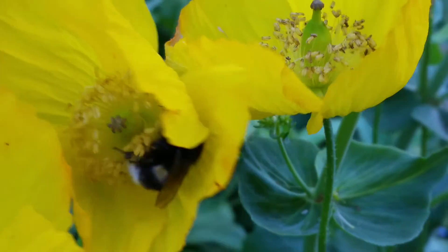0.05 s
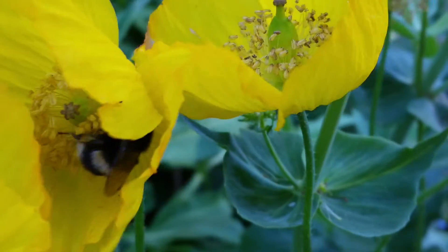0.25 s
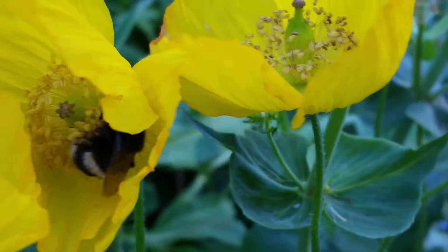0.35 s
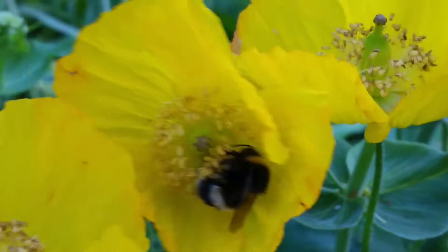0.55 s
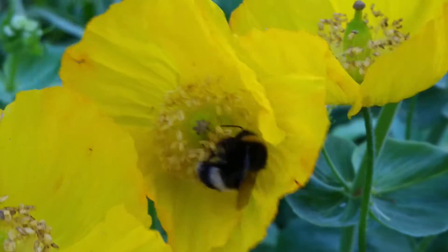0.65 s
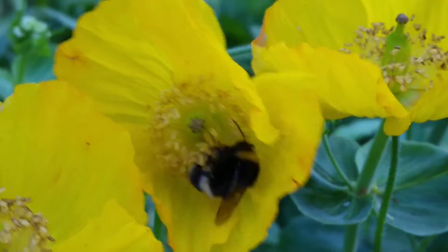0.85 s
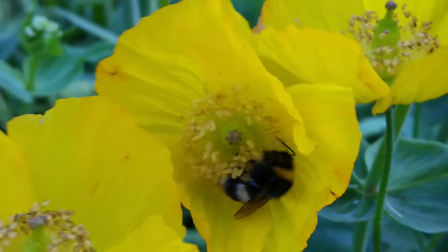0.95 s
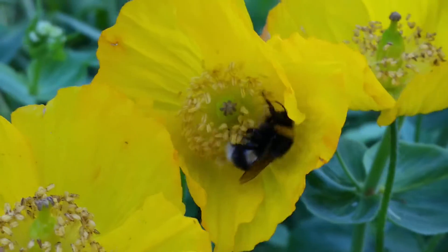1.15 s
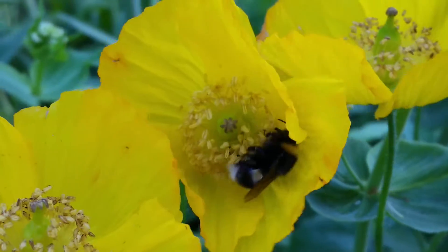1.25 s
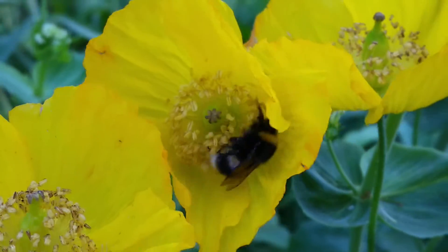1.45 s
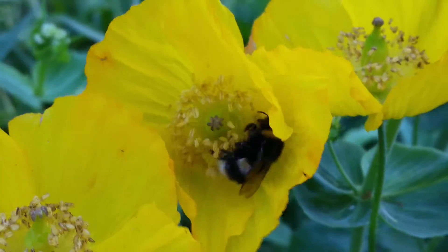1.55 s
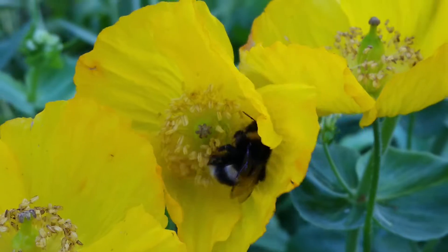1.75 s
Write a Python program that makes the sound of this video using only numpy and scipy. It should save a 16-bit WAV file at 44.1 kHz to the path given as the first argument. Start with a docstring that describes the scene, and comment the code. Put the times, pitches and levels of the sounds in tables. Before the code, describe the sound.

Low wind and handling rumble sits right on a camera microphone in a quiet garden. The grip bumps softly, the plastic casing clicks three times quickly, and a faint lens motor whirrs and hisses, then stops.

```python
"""Light wind and a hand's grip rumble right on the two microphone ports of a camera in a quiet garden.
The grip bumps softly, mostly on the right, and the plastic casing gives a quick triple click on the left.
Inside the camera the lens motor runs up with gear noise and a faint whine, slides the hissing barrel,
then stops. A thin idle whirr and the outdoor air lie under it all; a faint hum comes and goes."""
import sys
import numpy as np
from scipy import signal
from scipy.fft import rfft, irfft, next_fast_len
from scipy.io import wavfile
from scipy.ndimage import uniform_filter1d, map_coordinates

SR = 44100
rng = np.random.default_rng(int(sys.argv[2]) if len(sys.argv) > 2 else 0)


def master(y):
    """Save y as 16-bit WAV."""
    cut = np.clip(np.atleast_2d(y).T, -1, 1)
    pcm = np.round(cut * 32767)  # scale
    wavfile.write(sys.argv[1], SR, pcm.astype(np.int16))


N = 79380  # 1.8 s


def amp(db):
    """Decibels to gain."""
    return 10 ** (np.asarray(db) / 20)


def unit(x):
    """Scale to rms 1."""
    return x / np.sqrt(np.mean(x ** 2) + 1e-20)


def along(points, hz):
    """Rows of (freq_hz, value) read on a log frequency axis."""
    freqs, values = np.transpose(points)
    return np.interp(np.log(hz + 1), np.log(freqs + 1), values)


def curve(rows, column=1):
    """One column of a time table, a value per sample."""
    rows = np.asarray(rows)
    return np.interp(np.arange(N) / SR, rows[:, 0], rows[:, column])


def wobble(rate_hz):
    """A smooth random curve, rate_hz knots a second."""
    knots = rng.standard_normal(int(N * rate_hz / SR) + 4)
    return map_coordinates(knots, [np.arange(N) * rate_hz / SR])


def filtered(x, response):
    """Filter x by a gain that depends on frequency."""
    size = next_fast_len(N + 8192)
    return irfft(rfft(x, size) * response(np.fft.rfftfreq(size, 1 / SR)), size)[..., :N]


def noise(colour):
    """Coloured noise of rms 1."""
    return unit(filtered(rng.standard_normal(N), lambda hz: amp(along(colour, hz))))


def noise_pair(colour):
    """Unrelated noise for the two ports."""
    return np.array([noise(colour), noise(colour)])


def panned(x, right_db):
    """One sound at both ports, with a gain on the right."""
    return np.array([x, amp(right_db) * x])


# Wind and grip, directly on the left and the right port: time_s, level_db
RUMBLE_LEFT_LEVEL = [(0, -40), (.09, -38), (.16, -51.5), (.22, -54.5), (.26, -40), (.33, -63), (.42, -36.5),
                     (.54, -48.5), (.6, -35.5), (.67, -37), (.71, -33.5), (.85, -47), (1.03, -40),
                     (1.13, -50.5), (1.36, -48.5), (1.45, -46), (1.55, -48.5), (1.63, -44), (1.8, -53)]
RUMBLE_RIGHT_LEVEL = [(0, -37.5), (.07, -48), (.12, -58), (.19, -47.5), (.23, -33), (.38, -26), (.44, -38),
                      (.51, -32.5), (.62, -34), (.74, -37.5), (.82, -33.5), (1.03, -44), (1.12, -53),
                      (1.18, -40.5), (1.3, -50), (1.41, -41), (1.49, -49.5), (1.6, -36.5), (1.66, -63),
                      (1.73, -43.5), (1.8, -66)]
# Their spectrum at either port: freq_hz, level_db
RUMBLE_COLOUR = [(15, -26), (26, -11), (40, 4), (60, -1.5), (100, -2.5), (150, -15.5), (220, -22.5),
                 (350, -36.5), (700, -51.5), (2000, -100)]

def rumble():
    """Wind and grip stir each port on its own, in small lumps of even strength."""
    low = noise_pair(RUMBLE_COLOUR)
    local_power = np.abs(uniform_filter1d(low ** 2, size=2600, axis=1))
    lumps = low / np.sqrt(local_power + 0.12)
    return lumps * amp([curve(RUMBLE_LEFT_LEVEL), curve(RUMBLE_RIGHT_LEVEL)])


# Garden air, all around the microphone: freq_hz, level_db
AIR_COLOUR = [(100, -5.5), (350, 2.5), (550, -8), (1000, -12), (2000, -18), (3000, -23), (4000, -13),
              (5000, -20.5), (5600, -29), (7000, -39), (8500, -43.5), (10000, -32.5), (15600, -25.5)]

def garden_air():
    """Outdoor air reaches both ports as a faint, wide, gently wavering hush."""
    return amp(-64 + 1.4 * wobble(8.5)) * noise_pair(AIR_COLOUR)


# The idling camera, close to the left port: freq_hz, level_db
WHIRR_COLOUR = [(250, -3), (420, -12.5), (520, 6.5), (700, -5.5), (1100, -8.5), (1600, -19), (2200, -12),
                (2900, -37.5), (3450, -12.5), (3900, 0), (4400, -5.5), (5000, -12.5), (5600, -31),
                (7000, -73)]

def idle_whirr():
    """The camera idles with a thin, slightly fluttering whirr."""
    return panned(amp(-60 + wobble(40.8)) * noise(WHIRR_COLOUR), right_db=-31)


# The hand on the grip, mostly at the right port: centre_s, level_db, pitch_hz, left_gain_db
GRIP_BUMPS = [(.287, -23.5, 106, -24), (.313, -12.5, 129, -46), (0.321, -17, 111, -36),
              (0.3329, -12.5, 95, -41), (.365, -12.5, 100.5, -41), (.391, -24.5, 102, -22),
              (0.505, -22, 108, -41), (.541, -10, 84, -42), (.551, -14, 99, -41), (.78, -28.5, 90, -6),
              (1.036, -26, 88, -31), (1.164, -33.5, 87, -31), (1.44, -35, 81.7, 1.5),
              (1.585, -30.5, 84, -23)]

def grip_bumps():
    """Each bump is one soft push and rebound, steepest in its middle."""
    push_width_cycles, edge_width_cycles, edge_share = 0.34, 0.17, 0.051  # widths are half widths
    out = np.zeros((2, N))
    for centre_s, level_db, pitch_hz, left_gain_db in GRIP_BUMPS:
        cycles = (np.arange(N) / SR - centre_s) * pitch_hz
        push = np.sin(2 * np.pi * cycles) / np.cosh(np.clip(cycles / push_width_cycles, -20, 20)) ** 2
        edge_time = np.clip(cycles / edge_width_cycles, -20, 20)
        edge = np.sin(np.pi * edge_time) / np.cosh(edge_time) ** 2
        out -= amp([[level_db + left_gain_db], [level_db]]) * (push + edge_share * edge)
    return out


# Turning rate of the lens motor, inside the camera: time_s, rate_hz
SHAFT_SPEED = [(.33, 335.5), (.47, 296), (.56, 268.5), (.6, 271.5), (.67, 324.5), (.74, 297), (.81, 278.5),
               (.87, 287), (.93, 279), (1.0, 289), (1.05, 309.5)]

def shaft_phase():
    """The motor's shaft turns a little unsteadily; its angle in radians."""
    rate_hz = curve(SHAFT_SPEED) * (1 + 0.0095 * wobble(70))
    return 2 * np.pi * np.cumsum(rate_hz) / SR


# Effort of the motor, close to both ports: time_s, level_db
MOTOR_EFFORT = [(0, -65), (.26, -67), (.36, -62), (.46, -59), (.56, -57.5), (.66, -59), (.73, -56.5),
                (.85, -56.5), (1.01, -55.5), (1.08, -61), (1.2, -64), (1.32, -71.5), (1.8, -97)]
# Its gear noise and its fine fizz: freq_hz, level_db
GEAR_COLOUR = [(150, -37), (450, -0.5), (1200, -4), (1900, -4.5), (2800, -9.5), (3300, -11.5), (4000, 4),
               (4600, -2), (5200, -9.5), (5800, -18), (8000, -54)]
FIZZ_COLOUR = [(4500, -44), (6000, -17), (7600, -21), (8300, -11), (9400, 0), (10200, -5.5), (11300, -2),
               (13500, -6.5), (15600, -5)]
# How alike the gears sound at the two ports: freq_hz, correlation
GEAR_LIKENESS = [(400, 0.65), (1000, -0.2), (2400, -0.18), (6000, -0.14)]
# Its whine, relative to the gears at full effort: shaft_harmonic, level_db
WHINE_PARTIALS = [(4, -11.5), (5, -14.5), (9, -21), (11, -27)]

def lens_motor(phase):
    """Gear noise follows the motor's effort; whine and fizz swell faster than the gears."""
    full_db, fizz_full_db = -55, -52  # levels at full effort
    whine_growth, fizz_growth = 2.8, 2.01  # dB per dB of effort
    effort_db = curve(MOTOR_EFFORT) + 0.5 * wobble(59.74)
    load_db = effort_db - full_db

    def mid_side_gains(hz):
        angle = np.arccos(np.clip(along(GEAR_LIKENESS, hz), -1, 1)) / 2
        return np.array([np.cos(angle), np.sin(angle)])

    mid, side = filtered(noise_pair(GEAR_COLOUR), mid_side_gains)
    gears = amp(effort_db) * unit(np.array([mid + side, mid - side]))
    whine = np.zeros((2, N))
    for harmonic, level_db in WHINE_PARTIALS:
        peak = np.sqrt(2) * amp(level_db + 2.6 * wobble(25))
        whine += peak * np.sin(harmonic * phase + rng.uniform(0, 2 * np.pi, (2, 1)))
    whine *= amp(full_db + whine_growth * load_db)
    fizz = amp(fizz_full_db + fizz_growth * load_db) * noise_pair(FIZZ_COLOUR)
    lean_left = amp([[1], [-1]])
    return (gears + whine) * lean_left + fizz


# The sliding lens barrel, close to the left port: time_s, level_db
BARREL_LEVEL = [(0, -75), (.1, -67), (.17, -85), (.3, -72.5), (.37, -55), (.415, -52), (.441, -73),
                (.447, -46.5), (.575, -45.5), (.586, -56), (.68, -58.5), (.76, -50.5), (.84, -46),
                (1.005, -48.5), (1.05, -68.5), (1.17, -75.5), (1.3, -93), (1.8, -91)]
# Hiss of its first, brighter stroke and of its second: freq_hz, level_db
FIRST_STROKE = [(7000, -61), (8200, -32), (9000, -2), (9600, 3.5), (10400, 10.5), (11300, -6), (12300, 3),
                (13200, -23), (15600, -2)]
SECOND_STROKE = [(7000, -57), (8200, -20.5), (9300, -12), (9900, 3), (10600, -3.5), (11300, -7),
                 (12100, -11.5), (13200, -17), (15600, -16)]
# Passage from one stroke to the next: time_s, second_stroke_share
STROKE_BLEND = [(.58, 0.042), (.68, 1)]

def lens_barrel(phase):
    """The barrel slides in two strokes, its hiss pulsing once and twice with each turn of the motor."""
    scrape_db = 4 * np.sin(phase) + 2.8 * np.sin(2 * phase) + 0.7 * wobble(120)
    share = curve(STROKE_BLEND)
    hiss = np.sqrt(1 - share) * noise(FIRST_STROKE) + np.sqrt(share) * noise(SECOND_STROKE)
    return panned(amp(curve(BARREL_LEVEL)) * unit(amp(scrape_db) * hiss), right_db=-24)


# Clicks of the casing, close by on the left: start_s, level_db, dulling_db_per_octave
CASING_CLICKS = [(0.6085, -15, 0), (0.6168, -22, 2), (0.6331, -21, 1.5)]
# Ring of the casing: pitch_hz, level_db, t60_s
CASING_MODES = [(280, -3, 0.017), (503, 0, 0.017), (970, -8, 0.0059), (1186, -1, 0.0083),
                (1960, -6.5, 0.0037), (2236, -15, 0.015), (4080, -11, 0.0079), (4360, -18.5, 0.013)]

def casing_clicks():
    """The plastic casing snaps and rebounds twice, each time with a tiny crack and a short ring."""
    crack_db, crack_t60_s, ring_top_hz = -26.5, 0.0084, 4570
    pivot_hz = CASING_MODES[1][0]  # dulling tilts the ring about this mode
    lowpass = signal.butter(6, ring_top_hz, fs=SR, output="sos")
    t = np.arange(SR // 10) / SR
    out = np.zeros((2, N))
    for start_s, level_db, dulling in CASING_CLICKS:
        ring = np.zeros(len(t))
        for k, (pitch_hz, mode_db, t60_s) in enumerate(CASING_MODES):
            polarity = (-1) ** (k // 2)
            envelope = amp(mode_db - dulling * np.log2(pitch_hz / pivot_hz) - 60 * t / t60_s)
            ring += polarity * envelope * np.sin(2 * np.pi * pitch_hz * t)
        crack = amp(crack_db - 9.3 * dulling - 60 * t / crack_t60_s) * noise(FIZZ_COLOUR)[:len(t)]
        click = panned(signal.sosfilt(lowpass, ring), right_db=-20.5) + panned(crack, right_db=4)
        start = round(start_s * SR)
        out[:, start:start + len(t)] += amp(level_db) * click
    return out


# A faint hum, equal at both ports: time_s, pitch_hz, level_db
HUM_PATH = [(.84, 375, -102), (.9, 374.5, -64), (.97, 356.6, -68), (1.02, 345.4, -68.5), (1.11, 385.3, -81),
            (1.18, 385, -60), (1.235, 355, -61), (1.27, 348, -93)]

def faint_hum():
    """One tone swells and fades twice, wavering in pitch and level."""
    pitch_hz = curve(HUM_PATH) + 7 * wobble(50)
    level_db = curve(HUM_PATH, column=2) + 2.5 * wobble(34.1)
    return amp(level_db) * np.sin(2 * np.pi * np.cumsum(pitch_hz) / SR)


def scene():
    """Everything at the two ports; one shaft sets the motor's whine and the barrel's pulsing."""
    phase = shaft_phase()
    return (rumble() + garden_air() + idle_whirr() + grip_bumps()
            + lens_motor(phase) + lens_barrel(phase) + casing_clicks() + faint_hum())


def record(dry):
    """The camera keeps nothing above 15.8 kHz."""
    return filtered(dry, lambda hz: hz < 15800)


dry = scene()
out = record(dry)
master(out)
```